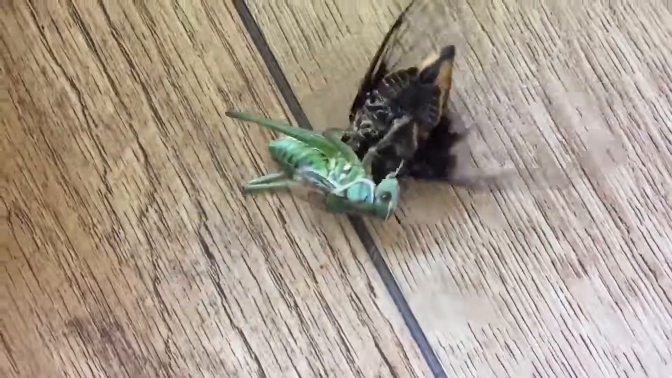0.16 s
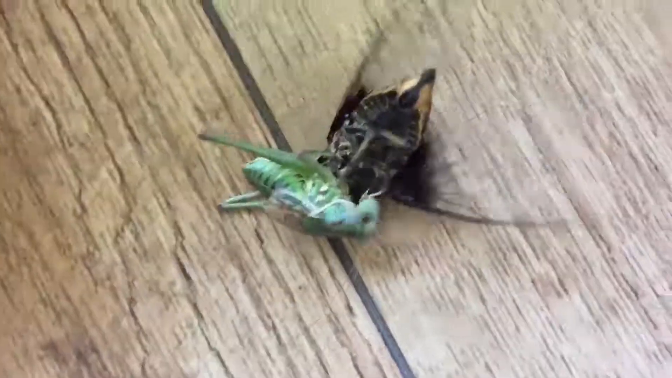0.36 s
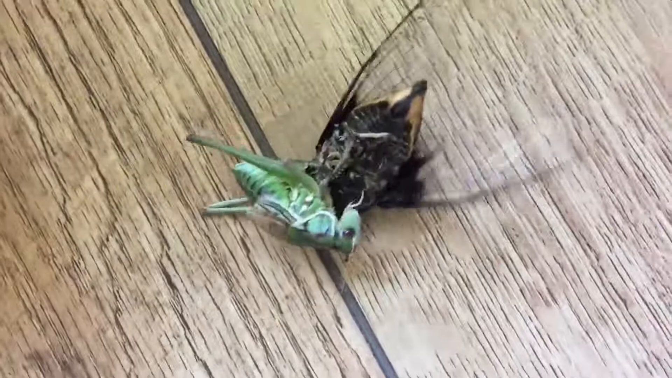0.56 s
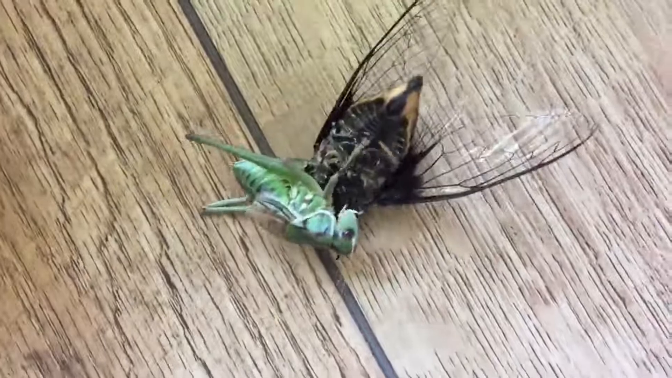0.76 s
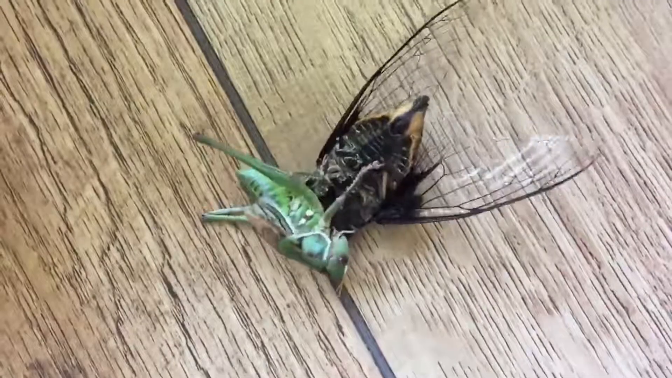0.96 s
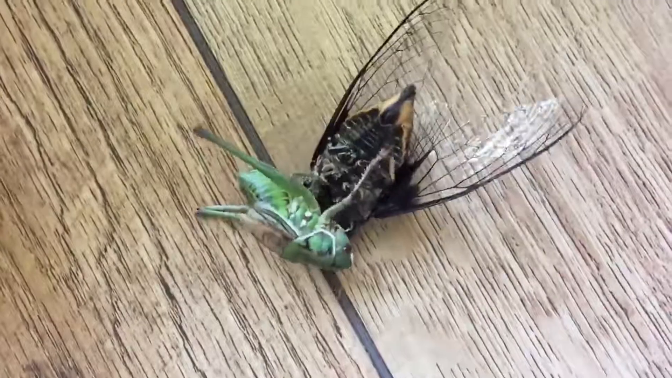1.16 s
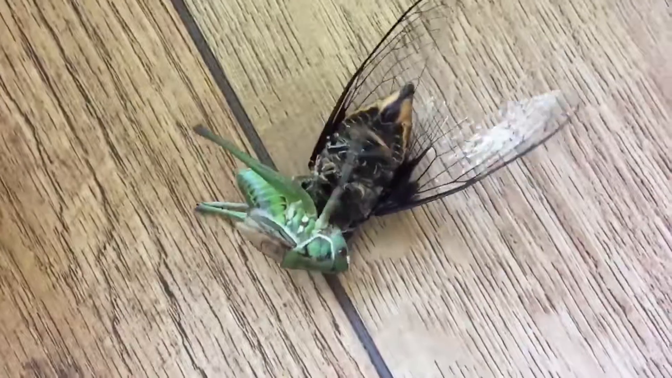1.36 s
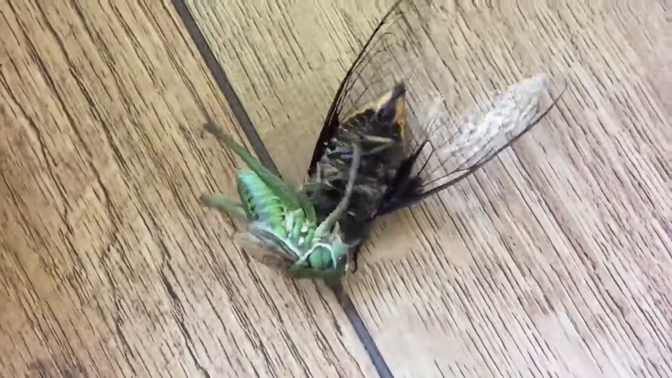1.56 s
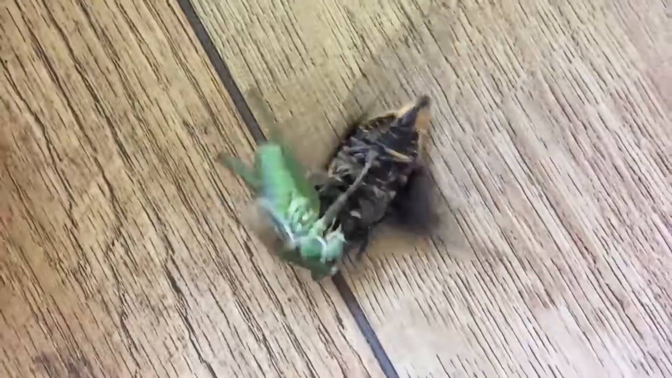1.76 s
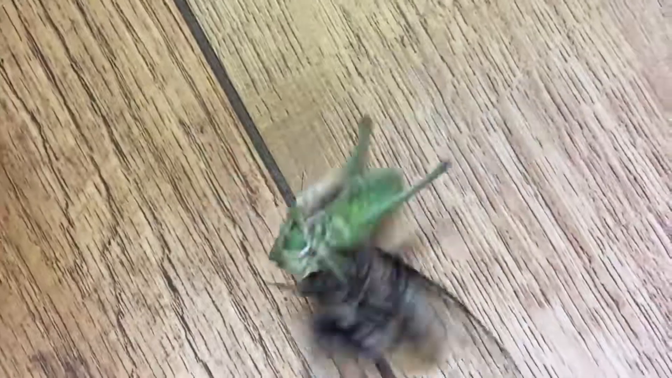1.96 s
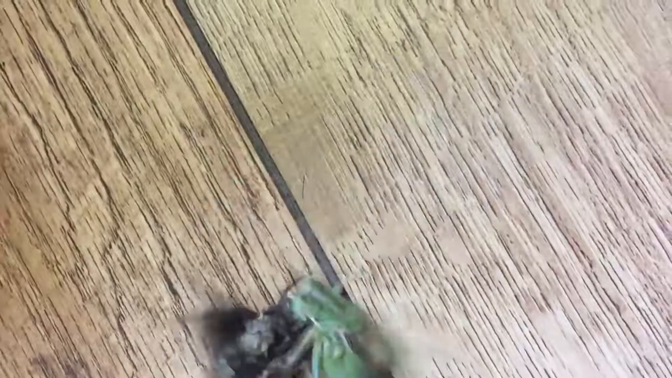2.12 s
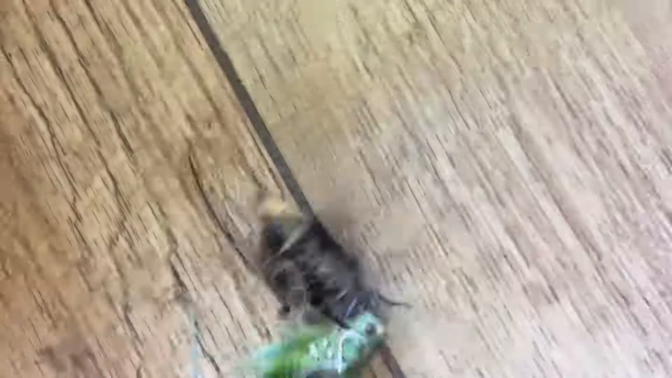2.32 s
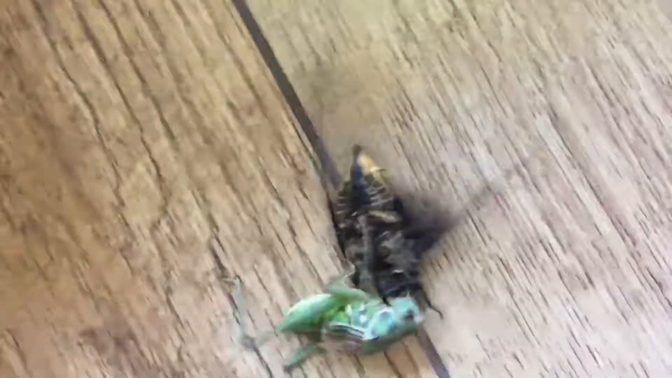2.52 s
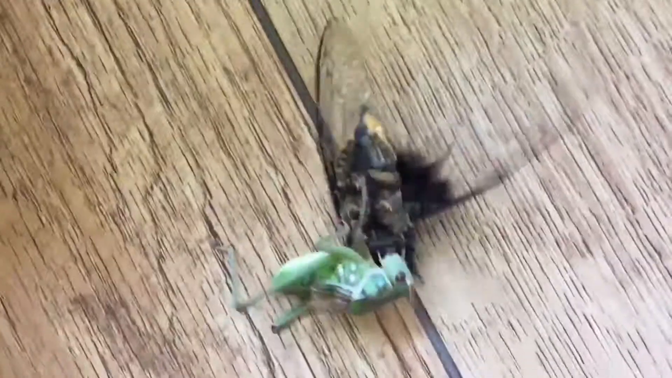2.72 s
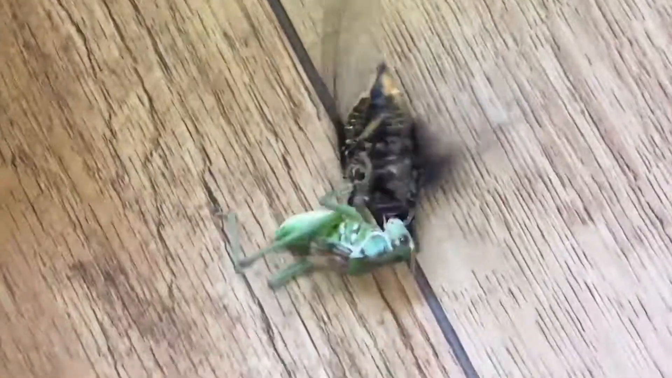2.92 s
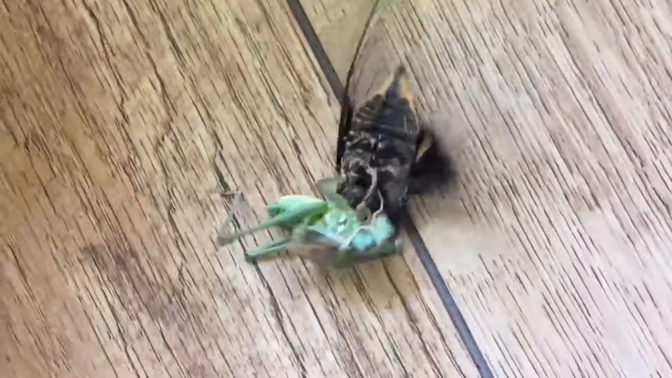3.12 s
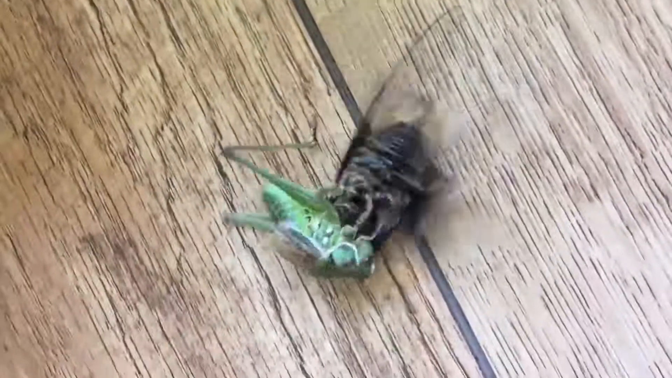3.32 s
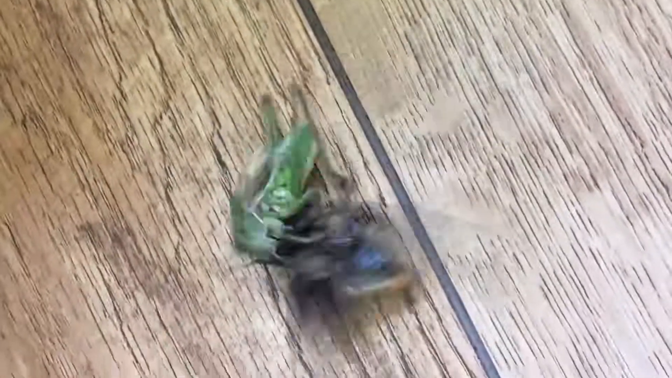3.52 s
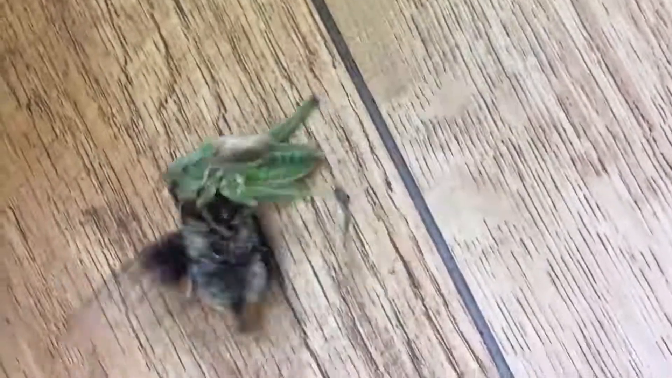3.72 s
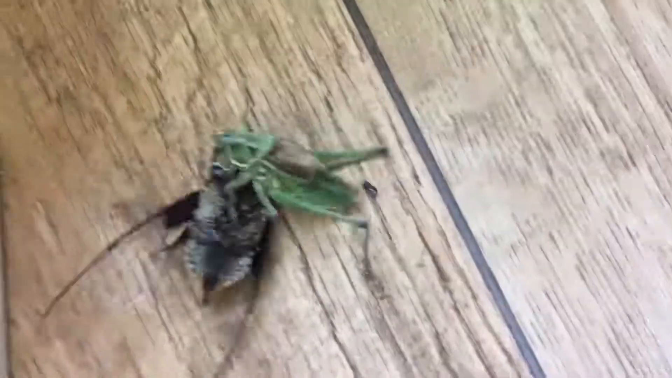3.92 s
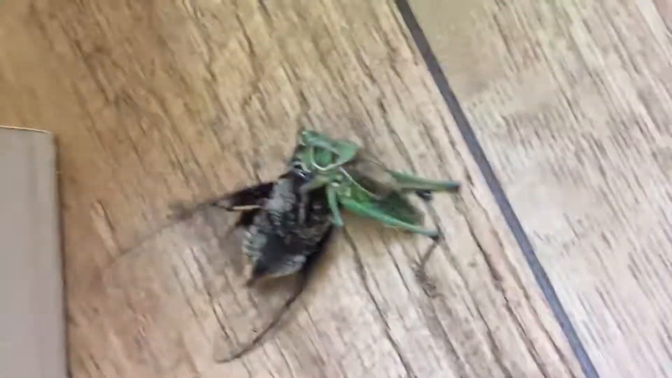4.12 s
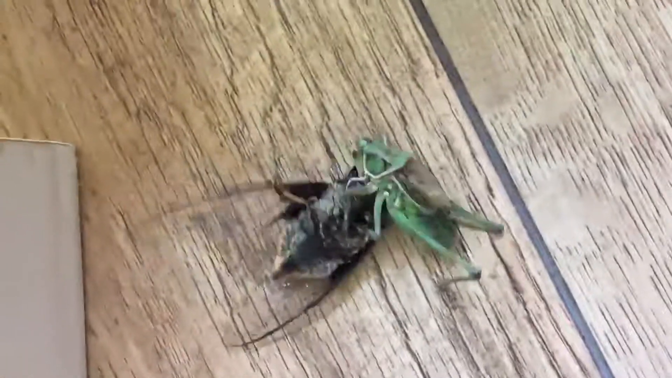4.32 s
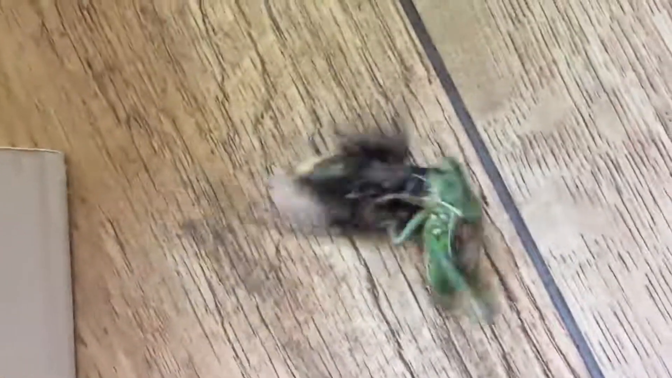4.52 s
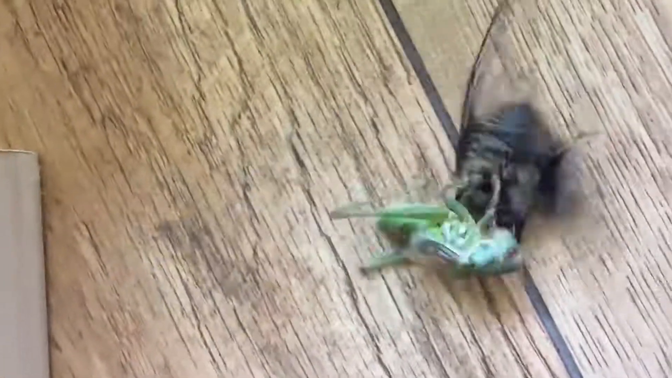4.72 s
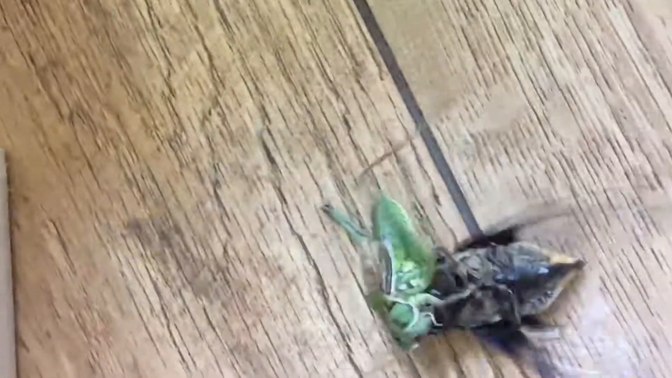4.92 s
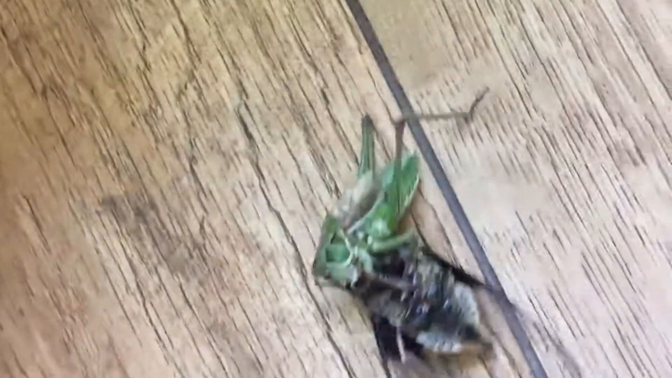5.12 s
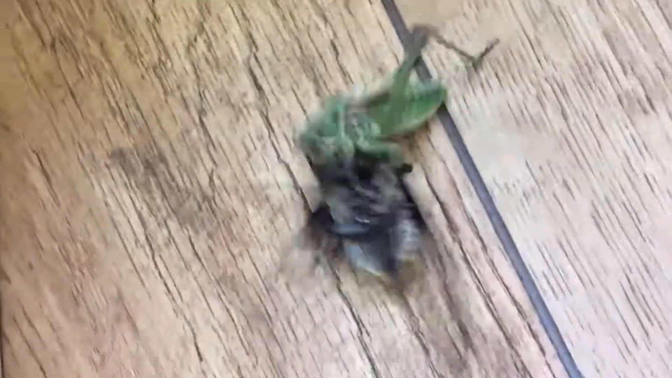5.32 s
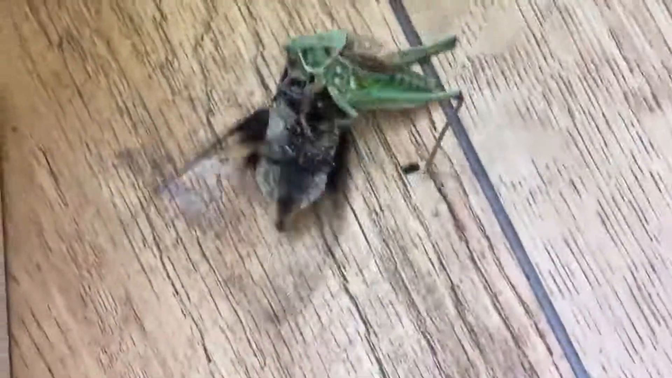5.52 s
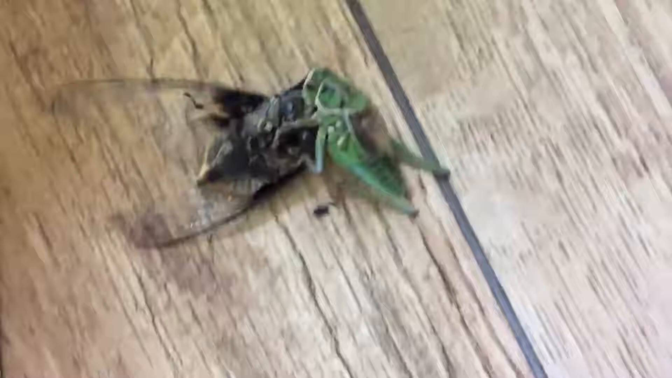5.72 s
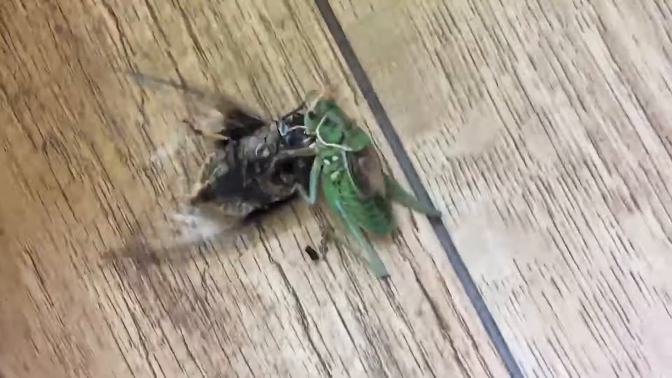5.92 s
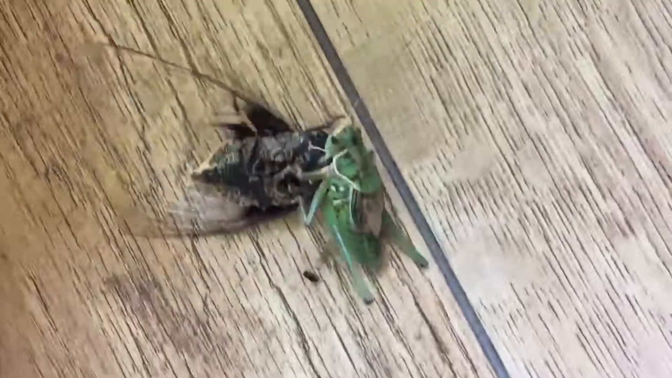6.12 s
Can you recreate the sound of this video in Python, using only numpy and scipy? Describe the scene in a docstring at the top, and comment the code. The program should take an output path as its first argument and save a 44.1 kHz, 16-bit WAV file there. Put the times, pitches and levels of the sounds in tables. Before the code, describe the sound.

Close indoor sound of a struggling insect: sparse papery wing slaps, then crackling rattles in stop-and-start runs with faint scraping over wood.

```python
"""A cicada held by a bush cricket thrashes on a wooden floor indoors, close to a phone.
First scuffs, low bumps and single wing slaps; from 1.7 s rattling runs of about 36 beats/s, to the end.
Each slap is a crackle of noise and a falling knock of the board, then a soft flap and a rustle.
Dragging noise grows after 2.5 s; a faint whine of wavering narrow-band noise is strongest near 3.8 s.
Noise-burst echo, low rumble and hiss make up the room throughout."""
import sys
import numpy as np
from scipy import signal
from scipy.fft import rfft, irfft
from scipy.io import wavfile

SR = 44100
rng = np.random.default_rng(int(sys.argv[2]) if len(sys.argv) > 2 else 0)


def dump(signal):
    """Clip the signal to [-1, 1] and save it as 16-bit WAV at the path in sys.argv[1]."""
    limited = np.clip(np.atleast_2d(signal).T, -1, 1)
    pcm = np.round(limited * 32767).astype(np.int16)
    wavfile.write(sys.argv[1], SR, pcm)


N = 272097
TIME = np.arange(N) / SR
LONG_HZ = np.fft.rfftfreq(N, 1 / SR)
BEAT = np.arange(2048) / SR  # time axis of one short sound, s
BEAT_HZ = np.fft.rfftfreq(len(BEAT), 1 / SR)
LEAD_S = .005  # time of the soft noise swell ahead of the impact

# wing slaps: t/s, level/dB, colour tips (body/dB, hollowness/dB, snap/dB, top/dB),
# rattle time before hold/ms, rustle re slap/dB, knock before gain/dB, flap delay/ms, flap/dB
SLAPS = [(0.1615, -2.5, 3, 3, 3.5, -3, 4.1, -8, -49.0, 29, -44),
         (0.2051, -1.5, 6, 3.5, -1, 2.5, 1.8, -12, -45, 16.0, -45),
         (0.3927, -1.5, 4, 5, 5.5, 0.0, 3.3, -13, -48, 16, -39),
         (0.5608, -3.5, 2.5, 1.5, 3, -7, 2, -9.5, -47.0, 16.4, -45),
         (0.8927, 1.6, -1, 2.5, 5.0, -1.5, 1.4, -16.0, -49, 19, -44),
         (0.929, -2, 3.5, 6, -5, 1, 3.4, -14, -45.0, 12.0, -53),
         (1.457, 6, -6.5, 2.5, 9, 4.5, 1.3, -35, -51.5, 11.0, -56),
         (1.7423, 2, -19, -6, -8, -8, 1.1, -17, -54, 18.6, -42.0),
         (1.779, 4, 5, -0.5, 3, 1, 1.5, -13.5, -42.0, 19.3, -35.0),
         (1.8067, 4.5, 0.5, -3, 1.0, -3, 2.5, -21, -47, 11.0, -61),
         (1.8348, 4.5, 6, -3, 4, 2.5, 2.1, -25.0, -40.5, 10.5, -40.0),
         (1.8621, 5, -1, -13, 3, 1.5, 3.4, -20, -42.0, 18.6, -35.5),
         (1.8901, 4, 5, -6, 0, 3.5, 2.3, -21, -47, 32, -43),
         (1.9182, 7, -1.5, -7.5, 4, 2.5, 2, -39, -46.0, 14.0, -36.5),
         (1.9463, 6, -8, -9, 7, 1.5, 2.3, -37, -50, 16.0, -43),
         (1.9729, 6, -4, -11, 6.0, 3, 2.4, -38, -42, 18, -39),
         (1.9993, 5.5, -2.0, -4, 6.5, 3, 3.5, -37, -43, 20.4, -40),
         (2.0271, 4, 1, -8, 3, 1, 3.2, -35, -48, 16.0, -48.0),
         (2.0525, 5, -11, -2, 1.0, 1.5, 3.2, -23, -46, 35, -49.0),
         (2.0791, 5, -5.5, -5.5, -3, 0.5, 2.5, -22, -48, 25, -47),
         (2.104, 3, -2.0, -1, 15, 5, 3.5, -26, -43.0, 19, -58),
         (2.13, 5, -10, -10, 0.0, -1, 3.2, -19, -45.0, 16, -52.0),
         (2.1561, 3, -6, -4.5, 6, 3, 4, -17, -49, 18.0, -48),
         (2.1815, 5.5, -11, -7, 2.0, 3.5, 4, -17, -47.0, 17.5, -43),
         (2.2061, 4, -2.0, -4, 7, 3, 3, -21, -44, 11.0, -57),
         (2.2321, 5.5, -2, -6, 5.0, 3, 3.2, -21, -48, 20, -39),
         (2.2577, 5.5, -6, -6, 3, 3.0, 2.7, -21, -44, 15, -51),
         (2.2831, 7.5, -1, -1, 5.0, 8.0, 3.9, -25.0, -44.0, 19.6, -33.5),
         (2.3086, 5.5, -10, -4, 6, 4, 3.8, -32, -46, 16.0, -56),
         (2.3348, 5.5, -1.5, 0, 6.5, 6.5, 3.8, -25.0, -44, 21, -44.0),
         (2.3612, 4.5, -10, -4.5, 1.0, -2, 2.7, -21, -44.0, 20.0, -43.0),
         (2.3885, 4.5, -7.0, -11, 6, 3, 3.2, -18, -43, 18, -50),
         (2.4164, 4.5, -10.5, -8, 0.0, 0.5, 2.8, -23, -44, 12.5, -34),
         (2.4458, 3, -4.5, -4, 3, -1, 3.3, -24, -42, 24, -31.5),
         (2.5456, 2.5, -17, -14, 2, 1.0, 2.7, -19, -47, 11.0, -46.0),
         (2.5747, 2.5, -11, 0.5, -1.0, -2.5, 2.8, -14, -44, 22.5, -39.0),
         (2.6016, 3.5, -8.5, -11, 1, -1, 3.2, -20, -43.0, 13.0, -34),
         (2.6283, 5.5, -18, -1, -1.0, 3, 3.2, -21, -46.0, 14, -38),
         (2.6543, 4, -18, -11, 2.0, -3, 3.2, -20.0, -46.0, 14.0, -32.5),
         (2.6811, 4, -7.0, -4.0, -3, 1, 3.8, -27, -46.0, 14.5, -35),
         (2.7085, 5.5, -10, -7, 2, 4, 3.2, -18.0, -55, 14, -33),
         (2.7346, 3, -13, -4, 5, 1, 3.9, -22, -53, 15.5, -32),
         (2.763, 4, -7.5, -3.5, 1, 2, 3.4, -21, -44.0, 15.0, -32.5),
         (2.857, 4.5, -13, -8, -6.0, 0, 2.2, -20, -44, 12, -45),
         (2.8876, 3, -1, -9, 6, -1.0, 4.3, -29, -42, 19, -38),
         (2.917, 3, -17, -7, -3, -4.5, 3.7, -23, -44.0, 18, -34),
         (2.9456, 2.5, -6, -8, 2.0, 0.5, 3.8, -14, -45, 16.0, -40.0),
         (2.9725, 1.5, 0.5, -3.5, -1, -4, 4.4, -16.0, -44.0, 25, -41.0),
         (3.0042, 0.8, -9, -8, -4, -4, 3.4, -18, -48.0, 15.6, -42.0),
         (3.041, 1.2, -13, -17, 1.5, -2, 2, -20, -42.5, 22.0, -47),
         (3.1314, 1.3, -2, -1, -3, -2, 2.4, -13.5, -52.0, 18, -40),
         (3.1622, 3, -4, -4, -2, -3.5, 3.1, -13.5, -45, 18.5, -35.0),
         (3.2375, 5, -2.5, -3, 5, -5, 1.6, -13.5, -51, 18, -37.0),
         (3.269, 3, -7, 1, 4.5, -1, 2.8, -18.0, -45.0, 17.5, -42),
         (3.3289, 1.5, -8, -4, -2, -1, 1.1, -10.5, -54.0, 17, -42),
         (3.3598, 1, 1.0, 4, -2.0, 0.5, 4.3, -9, -43.0, 15.6, -33),
         (3.3874, 1.2, 0, 3, -1, -1, 3.9, -10.0, -47, 15, -56),
         (3.4152, 1.7, 0, 5, -4, 0.5, 4.1, -12, -41.0, 18, -58),
         (3.4422, 1.5, 5, 3, -3, 3, 3.7, -10.0, -40.5, 22.0, -46),
         (3.4696, 3, 1.5, -3.0, -4.0, -1, 3.9, -15.0, -41, 14.0, -45),
         (3.4971, 6, 2, -1, -4, 4, 2.7, -16, -41, 17, -33.5),
         (3.5258, 3.5, -2, 3.5, -5, 0.5, 2.3, -18.0, -45, 12, -37),
         (3.5528, 3.5, 1, -2, 2, 1.5, 3.2, -16, -42, 15.6, -39),
         (3.5797, 4, -6, -1, 3.5, -0.5, 2.9, -15, -41, 23.0, -53),
         (3.6074, 4.5, -9, -5, 2, -6, 2.3, -18, -48, 11.0, -38),
         (3.635, 4.2, -10, -15, 0.0, -4, 2.5, -14, -53, 14.0, -37),
         (3.6627, 3, -9, -2, 0, 0.5, 3.3, -19, -47, 20.4, -35),
         (3.7701, 5, 0.0, -2.5, 0.5, 9, 1.9, -25.0, -49.0, 18, -44),
         (3.8031, 4.5, -6.5, -7, -3, -2, 1.7, -22, -45.0, 32, -37),
         (3.8909, 1.8, -5.5, -9, -2, -2, 2.6, -15.0, -47.0, 16, -49),
         (3.9244, 3, -4, -12, 0, -1, 3, -16, -43.5, 14.0, -36.5),
         (4.0317, 5, -1.0, -1, -3, 6.5, 1.9, -19.0, -48, 14.0, -54),
         (4.0651, 3.5, -1, -3, -8, 2.5, 2.5, -18, -57, 14.0, -37),
         (4.1136, -1.5, 3, 0, -6, -2, 2.2, -9.5, -57, 14.0, -52),
         (4.2401, 3, 3.5, 0.0, -5, 6.5, 1.9, -11.5, -52, 16.0, -58),
         (4.273, 1.5, 6, -2, -8, 0.5, 2, -10.5, -47, 13.3, -39),
         (4.305, 4, 3, 3, -4, -0.5, 2, -15, -56, 22, -41),
         (4.4257, 4.5, -1, 0.5, 1.0, -2, 1.1, -10.5, -47, 19.0, -44),
         (4.456, 3, -2, 6.0, -4, -5, 2.1, -14.5, -42, 10.1, -42),
         (4.4837, 3, 3.5, 8.0, -5, -2, 2.1, -11.5, -43.0, 14, -53),
         (4.5159, 0.9, -9, -1, -6, -8, 2.5, -11.5, -43.0, 11.0, -51.0),
         (4.549, 3.5, 5.5, -3, 2, 1.5, 1.7, -14.0, -45, 14.0, -55),
         (4.578, 4.5, 9.5, 6, 4, 3.5, 1.9, -13, -42.0, 12.0, -43),
         (4.607, 3, 2, -0.5, -3, -1.5, 3.1, -12, -41.0, 11, -45),
         (4.6353, 1.5, 1.0, -9, -1, -2.0, 3.1, -9.5, -46, 15, -43),
         (4.6628, 2.5, 2, -6, 2, -2, 3.8, -13.0, -42.5, 13.0, -45),
         (4.692, 3, 0, -4, -3, -4.5, 3.6, -12, -41.5, 17, -43),
         (4.723, 3.5, 1, -1, -2.0, -1.0, 2.2, -14, -46.0, 16.0, -32.5),
         (4.7554, 4, -4, -3, -3.0, -3.5, 2.2, -15.0, -49, 27, -35),
         (4.7839, 3, 0, 1, -3, -1.5, 3.6, -13, -50, 11, -59),
         (4.8117, 3.5, 6, 4, 4, 5.0, 2.8, -15, -43.0, 21.0, -64),
         (4.8393, 3.5, -1, 0.0, -3, -2.5, 2.2, -13, -43, 16, -37),
         (4.8679, 3, 4, 0, -3.0, 0.0, 2.8, -12, -45.0, 16.0, -37.0),
         (4.8983, 2, 3.5, -3, 4, -2.5, 3.4, -10.5, -39, 17.8, -31.5),
         (5.011, 4.5, -4, 4.5, 6.5, -2.5, 1.5, -16, -50, 13, -43),
         (5.0458, 6, 2, 1, -1, 1, 2.4, -22, -42.0, 16.3, -36),
         (5.073, 4, 5, 8.0, 2, 3, 2.6, -16, -40.5, 11.6, -46),
         (5.1013, 5, 1, 1, 1, -1, 2.2, -22, -40.5, 14, -47),
         (5.1329, 2.3, 0, 7, 0.0, -0.5, 1.9, -21, -43, 11.0, -63),
         (5.246, 3, -5, 5.5, 3.5, 1.0, 1.3, -11, -64, 14, -59),
         (5.279, 8, -4.5, 4.5, -0.5, -1.5, 1.5, -18, -41, 13.0, -38),
         (5.3073, 5.5, -3.5, 4.5, -2, -2, 2.4, -15.0, -38, 14.0, -37),
         (5.3362, 5, -6, 0.5, -11, -2, 2.4, -10.0, -43.0, 16, -34),
         (5.3636, 5.5, -7, 0.5, -7, -2.0, 2.2, -12, -44, 20, -35),
         (5.3904, 3.5, 3.0, 7.5, -4, 3, 3.3, -14, -55, 20, -36.0),
         (5.418, 3.5, 5, 0, 1, 1.5, 2.9, -12, -49, 16, -42),
         (5.4457, 4.5, 5, -1, 2.5, -1.5, 2.1, -14, -45, 19.0, -43),
         (5.4758, 0.5, 5.0, -2, -2, -5, 3.5, -7, -56, 20, -31.5),
         (5.596, 1.7, 5, -1, 9.5, 3, 1.5, -7.5, -51, 20, -39),
         (5.6307, 5, 6.5, 1, 0, 2.5, 2.1, -12.5, -48, 15, -44),
         (5.6573, 3, 3.5, 4, -6.0, -2, 2.5, -12, -49, 17, -50),
         (5.6847, 4, 3, 1.5, -6, 0.0, 3.1, -18, -45, 11.0, -48),
         (5.7192, -2, 1.5, -13, -6, -5, 2.6, -7, -50, 14.0, -34.0),
         (5.8356, 2.5, -0.5, 0.5, -4, 0.5, 2.1, -11.5, -57, 14.0, -45),
         (5.8692, 3.5, -5, -4, -5, -3, 2.1, -18, -45, 19, -39),
         (5.9913, 1.7, -6, -1, -7, -4, 1.8, -8.5, -52, 19, -37),
         (6.025, 4.5, 3.5, 3, -4.5, 0.5, 1.4, -31, -50, 19.3, -32.5),
         (6.0592, -1, 4, 4, 4, -5, 1.8, -12.5, -48, 15.0, -38.0)]
# colour of sliding membrane, claws and bodies: f/Hz, level/dB
RUSTLE_COLOUR = [(300, 0), (1000, -4.5), (2300, -1), (6000, -1), (10000, -4.5), (15000, -7)]


def undb(db):
    """Decibels to gain."""
    return 10 ** (np.asarray(db) / 20)


def unit(x):
    """Scale to unit energy."""
    return x / np.sqrt(np.sum(x ** 2) + 1e-18)


def along(hz, points):
    """Read (Hz, dB) points on a log-frequency axis."""
    knots_hz, db = np.transpose(points)
    return np.interp(np.log(hz + 1), np.log(knots_hz), db)


def colour(x, db):
    """Causal minimum-phase filter with the given gain in each frequency bin of x."""
    cepstrum = irfft(np.log(undb(db)))
    half = len(cepstrum) // 2
    # fold the cepstrum onto positive time
    cepstrum[1:half] *= 2
    cepstrum[half + 1:] = 0
    return irfft(rfft(x) * np.exp(rfft(cepstrum)))


def steady(gain):
    """Noise of rms 1 with the given spectrum."""
    noise = rfft(rng.standard_normal(N))
    return unit(irfft(noise * gain, N)) * np.sqrt(N)


def walk(rate_hz):
    """Random levels joined by straight lines, rate_hz of them a second."""
    return np.interp(TIME * rate_hz, np.arange(1024), rng.standard_normal(1024))


def add(track, s, sound):
    """Mix a sound into the track at time s."""
    start = max(int(s * SR), 0)
    part = sound[:max(N - start, 0)]
    track[start:start + len(part)] += part


def crackle(envelope, spread_db):
    """Dense clicks of uneven size under an envelope, at unit energy."""
    clicks = rng.standard_normal(len(BEAT))
    sizes = undb(spread_db * rng.standard_normal(len(BEAT)))
    return unit(envelope * clicks * sizes)


def swoop(from_hz, to_hz, length_s):
    """A few cycles gliding in pitch under a half-sine envelope."""
    u = np.minimum(BEAT / length_s, 1)
    phase = 2 * np.pi * np.cumsum(from_hz * (to_hz / from_hz) ** u) / SR
    return np.sin(phase) * np.sin(np.pi * u)


def wings(scuff_gain_db=12):
    """The dry, bright sounds: slap, return rustle, scuffing legs and wing tips."""
    # legs and wing tips scuffing between the beats: t/s, level before gain/dB
    scuffs = [(0.152, -29), (0.175, -29), (0.384, -36), (0.422, -34), (0.552, -40), (0.65, -57),
              (0.68, -58), (0.755, -65), (0.80, -66), (1.085, -58), (1.11, -60), (1.205, -61)]
    out = np.zeros(N)
    for s, db, body_db, hollow_db, snap_db, top_db, rattle_ms, rustle_db, *_ in SLAPS:
        add(out, s - LEAD_S, undb(db) * slap(body_db, hollow_db, snap_db, top_db, rattle_ms))
        rustle_s = s + .009 + 0.0011 * rng.standard_normal()
        add(out, rustle_s, undb(db + rustle_db) * rustle(0.0094))
    for s, db in scuffs:
        add(out, s, undb(db + scuff_gain_db) * rustle(0.0047))
    return out


def slap(body_db, hollow_db, snap_db, top_db, rattle_ms, tick_s=0.00069, tick_gain=0.6,
         tick_top_db=-6, grain_db=0.86, hold=1.35, lift=1.3):
    """A faint noise swells in, a dull tick hits, then veins and membrane rattle out."""
    # colour of a slap: f/Hz, level/dB
    wing_colour = [(200, -15), (500, -16), (850, -10.5), (1300, -5), (1800, -5), (2350, 0.5), (3000, -3.5),
                   (4200, -4), (6200, 2), (7600, -0.5), (9500, 0.5), (10400, -4), (11500, 0), (15000, -5)]
    since = BEAT - LEAD_S
    after = np.maximum(since, 0)

    lead_in_envelope = (since < 0) * np.exp(np.minimum(since, 0) / .0018)
    lead_in = undb(-20) * crackle(lead_in_envelope, 1)

    tick = crackle((1 - np.exp(-after / .0001)) * np.exp(-after / tick_s), 0)
    # the thick front edge sounds duller than the thin membrane
    tick = colour(tick, along(BEAT_HZ, [(5000, 0), (9000, tick_top_db)]))

    # the rattle holds while the wing lies on the board and stops as it lifts
    contact = after * 1000 / max(rattle_ms, .3)
    rattle = crackle((since >= 0) * np.exp(-(contact / hold) ** lift), grain_db)

    # the angle of the wing tips the colour of each blow
    tip_db = along(BEAT_HZ, [(500, body_db / 2), (1300, body_db), (2400, hollow_db), (4000, snap_db),
                             (5800, 0.0057), (8000, 0.0042), (12000, top_db)])
    blow = tick_gain * tick + rattle + lead_in
    return unit(colour(blow, along(BEAT_HZ, wing_colour) + tip_db))


def rustle(length_s, uneven_db=4):
    """A short swell of membrane or claws sliding, its strength stepping every 1.5 ms."""
    u = BEAT / length_s
    swell = u * np.exp(-u ** 2)
    catches = undb(uneven_db * np.repeat(rng.standard_normal(len(BEAT) // 64), 64))
    return unit(colour(crackle(swell * catches, 1.4), along(BEAT_HZ, RUSTLE_COLOUR)))


def thuds(knock_gain_db=6, fan_gain_db=4.5):
    """Each beat bends the board (highs arrive first), fans the air and flaps back; soft bumps join."""
    # air fanned by the wings: t/s, level before gain/dB
    air = [(0.0, -65), (0.22, -61), (0.34, -66), (0.43, -60), (0.5, -63), (0.57, -53), (1.46, -62),
           (1.49, -60), (1.56, -58), (1.65, -43), (1.7, -59), (1.89, -59), (1.94, -47), (2.08, -45),
           (2.16, -52), (2.34, -47), (2.54, -53), (2.59, -45), (2.75, -48), (2.82, -49), (2.89, -47),
           (3.01, -53), (3.09, -68), (3.16, -51), (3.33, -64), (3.59, -50), (3.86, -56), (3.9, -64),
           (4.4, -58), (4.45, -56), (4.74, -66), (4.81, -55), (4.91, -68), (5.14, -53), (5.24, -64),
           (5.29, -65), (5.59, -62), (5.64, -51), (5.95, -61), (6.03, -67), (6.17, -63)]
    # soft low bumps: t/s, nominal f/Hz, level/dB
    bumps = [(0.406, 95, -47), (0.625, 90, -52), (0.747, 90, -45), (1.555, 197, -51.5), (1.628, 103, -45),
             (3.908, 102, -42), (4.048, 103, -44), (4.437, 100, -42), (5.618, 84, -45), (6.01, 85, -45)]
    out = np.zeros(N)
    for s, *_, knock_db, flap_ms, flap_db in SLAPS:
        add(out, s, undb(knock_db + knock_gain_db) * swoop(558, 184, 0.00863))

        pitch_chance, length_chance = rng.standard_normal(2)
        flap = swoop(680 * np.exp(0.13 * pitch_chance), 181, 0.00973 * np.exp(0.14 * length_chance))
        # start early: the delay points near the flap's middle
        add(out, s + flap_ms / 1000 - .0042, undb(flap_db) * flap)

        # level read near the middle of the puff
        fan_db = np.interp(s + 0.018, *np.transpose(air)) + fan_gain_db
        add(out, s, undb(fan_db) * swoop(128, 79, 0.037))
    for s, hz, db in bumps:
        add(out, s, undb(db) * swoop(hz * 0.95, hz * 0.98, 0.027))
    return out


def dragging(uneven_db=5.0, top_db=-8):
    """The two soft bodies slide over the wood in fits and starts, duller than the wings."""
    # bodies dragging over the wood: t/s, level/dB
    drag_level = [(0, -62), (1.7, -64.5), (2.5, -54), (3.2, -50), (3.75, -48.5), (4.15, -48), (4.4, -52),
                  (5.0, -49), (5.5, -50.5), (5.9, -51), (6.17, -55.5)]
    spectrum_db = along(LONG_HZ, RUSTLE_COLOUR) + along(LONG_HZ, [(6000, 0.0078), (10000, top_db)])
    level_db = np.interp(TIME, *np.transpose(drag_level)) + uneven_db * walk(60)
    return steady(undb(spectrum_db)) * undb(level_db)


def room(x, build_s=0.0015):
    """Diffuse echo of a furnished room: noise bands, each decaying 60 dB in its own t60."""
    # echo bands: f/Hz, level/dB, t60/s
    echo_bands = [(100, -17.5, 0.9), (367, -10.5, 0.27), (925, -13, 0.2), (2060, -10, 0.33),
                  (5560, -16, 0.18), (10400, -14.5, 0.18), (14900, -17, 0.26)]
    t = TIME[:SR * 3 // 4]
    hz = np.fft.rfftfreq(len(t), 1 / SR)
    noise = rfft(rng.standard_normal(len(t)))
    centres = np.log([row[0] for row in echo_bands])
    build = 1 - np.exp(-(t / build_s) ** 2)
    echo = 0
    # triangular bands that crossfade on a log-frequency axis
    for share, (_, db, t60_s) in zip(np.eye(len(echo_bands)), echo_bands):
        band = irfft(noise * np.interp(np.log(hz + 1), centres, share), len(t))
        decay = np.exp(-np.log(1000) * t / t60_s)
        echo = echo + undb(db) * band * unit(decay * build)
    return signal.fftconvolve(x, echo)[:N]


def whine(waver_db=3):
    """Narrow noise bands heard as tones, each wavering on its own in strength."""
    # tones: f/Hz, half-width at 1/e gain/Hz, relative level/dB
    whine_tones = [(1428, 44, -2), (1703, 130, 1.5), (2144, 75, 1)]
    # loudness of their sum: t/s, level/dB
    whine_level = [(0, -72.5), (1.0, -70.5), (1.7, -63.5), (2.4, -62), (3.1, -56), (3.6, -56),
                   (3.82, -46.5), (4.0, -49.5), (4.2, -49.5), (4.45, -54), (5.2, -57), (6.17, -62)]
    tones = np.zeros(N)
    for hz, width_hz, db in whine_tones:
        tone = steady(np.exp(-((LONG_HZ - hz) / width_hz) ** 2))
        tones += tone * undb(db + waver_db * walk(21))
    return unit(tones) * np.sqrt(N) * undb(np.interp(TIME, *np.transpose(whine_level)))


def quiet(level_db=-60, waver_db=0.3):
    """Low rumble and faint hiss of the room, wavering a little."""
    # colour of the quiet room: f/Hz, relative level/dB
    quiet_colour = [(15, -53), (25, -6.5), (104, 8.5), (193, 0.5), (274, -6.5), (848, -24), (1300, -14),
                    (1900, -27.5), (2060, -12.5), (3090, -20), (4150, -14.5), (6380, -15.5), (10400, -35.5),
                    (14300, -34), (15500, -60)]
    return steady(undb(along(LONG_HZ, quiet_colour))) * undb(level_db + waver_db * walk(12))


def scene(side_db=-16):
    """The struggle is dead ahead; only a trace of the echo differs between the ears."""
    bright = wings() + dragging()
    direct = bright + thuds()
    mid = direct + room(direct) + whine() + quiet()
    side = undb(side_db) * room(bright)
    return np.array([mid + side, mid - side])


def record(dry, low_hz=32, top_hz=15400):
    """The phone drops the deepest rumble and cuts the top."""
    low_cut = signal.butter(2, low_hz, "high", fs=SR, output="sos")
    top_cut = signal.ellip(8, .2, 70, top_hz, fs=SR, output="sos")
    return signal.sosfilt(top_cut, signal.sosfilt(low_cut, dry))


dry = scene()
out = record(dry)
dump(out)
```